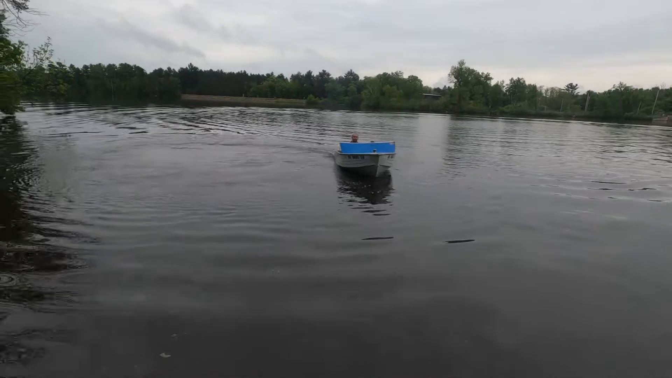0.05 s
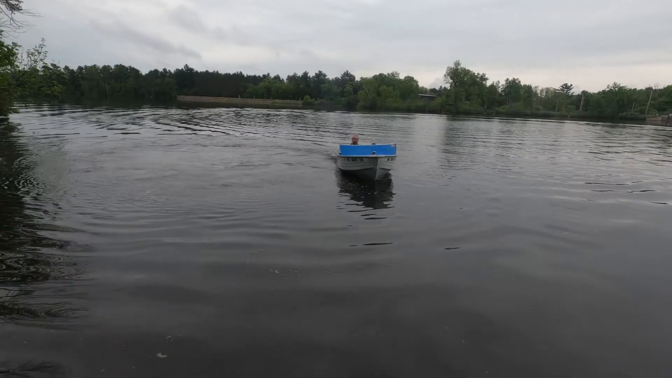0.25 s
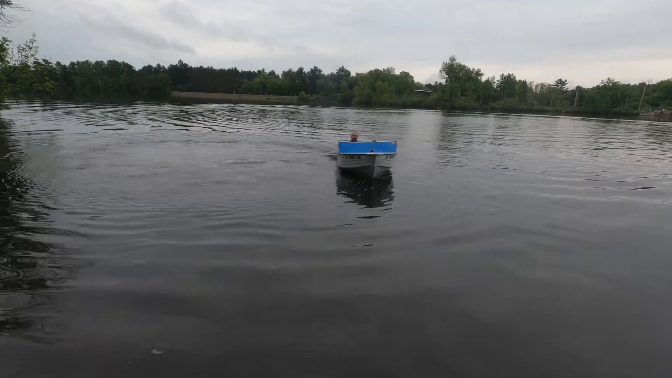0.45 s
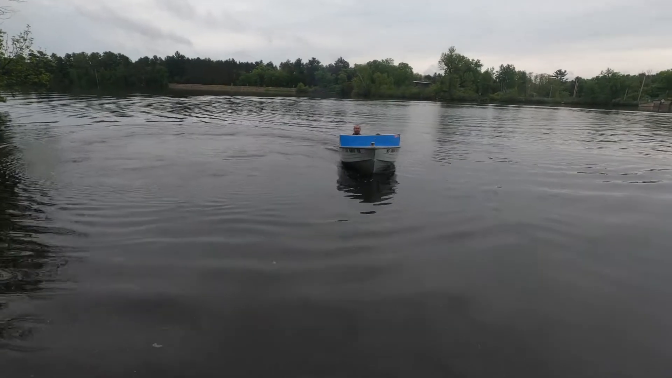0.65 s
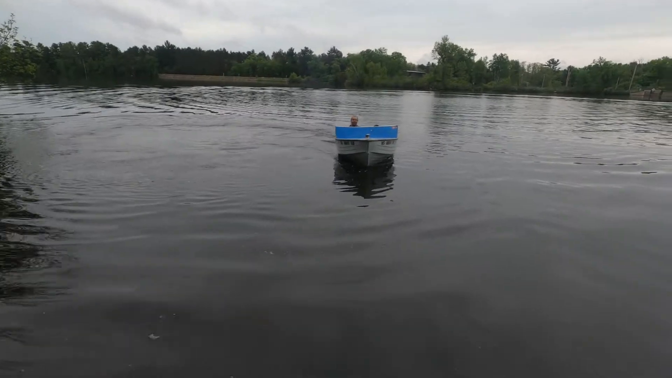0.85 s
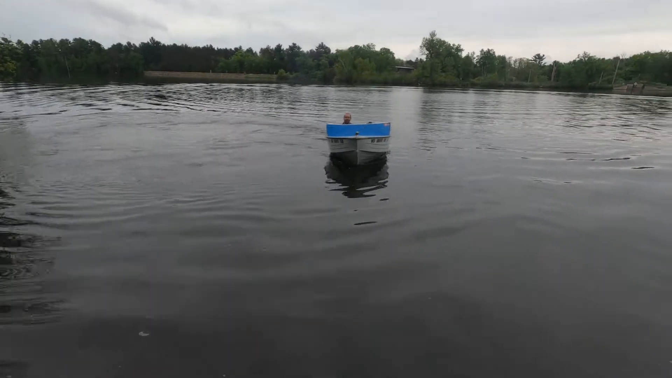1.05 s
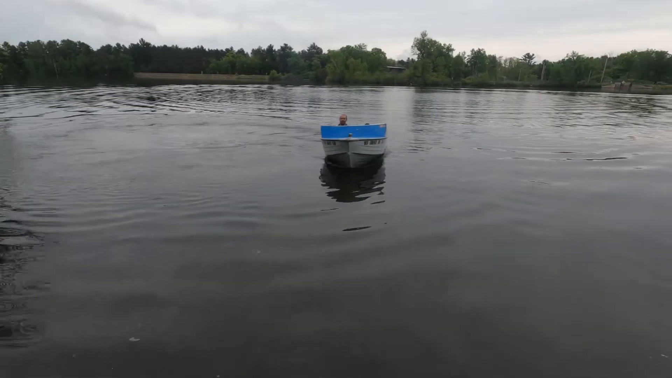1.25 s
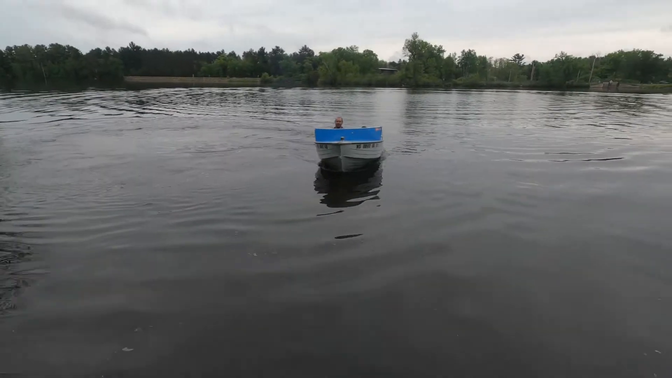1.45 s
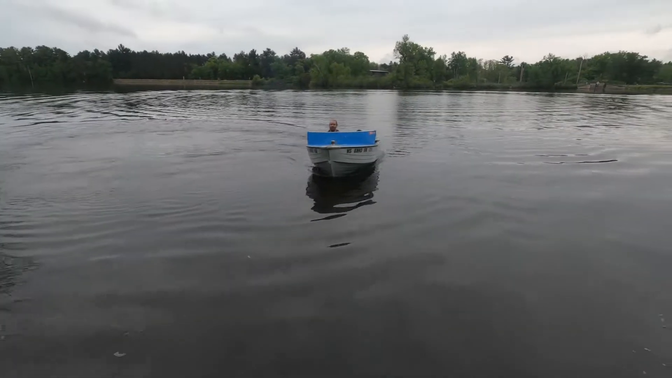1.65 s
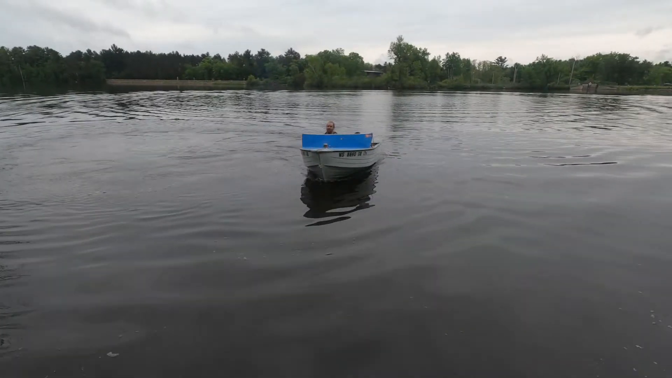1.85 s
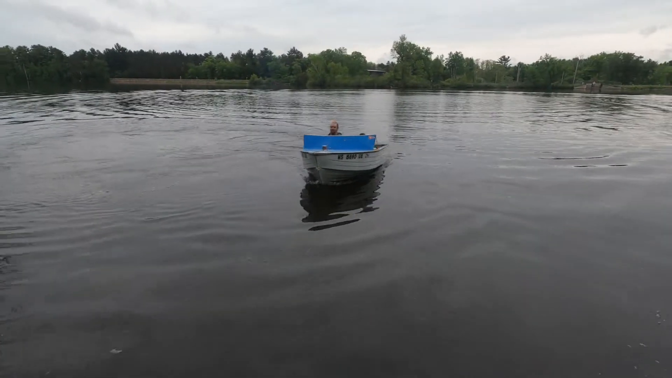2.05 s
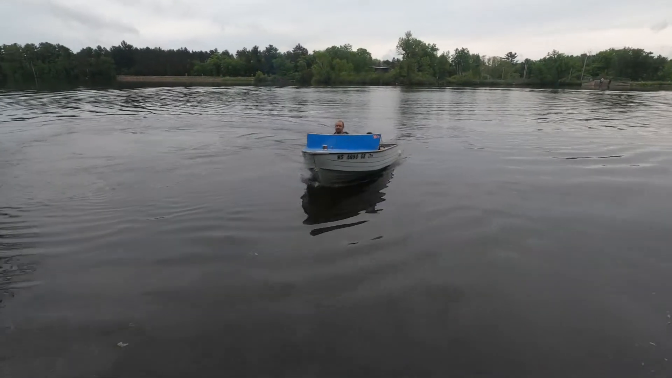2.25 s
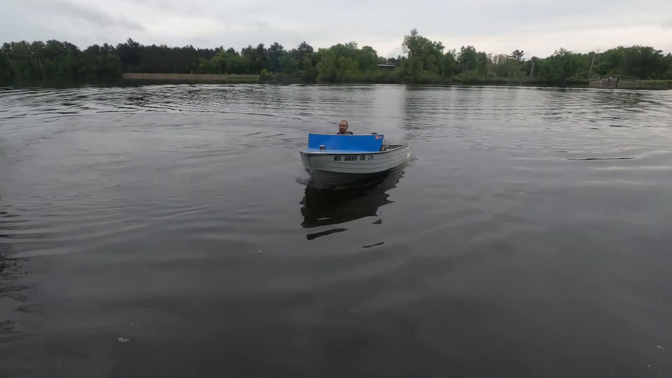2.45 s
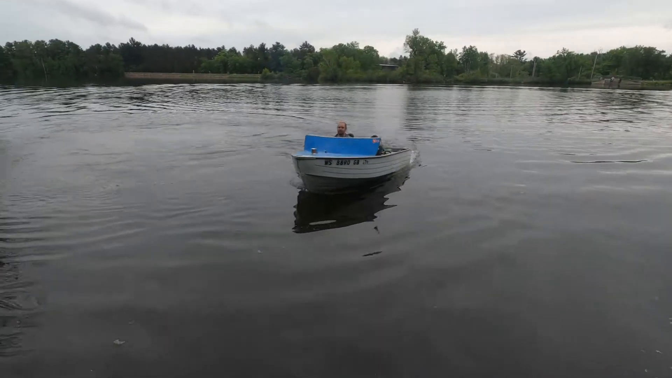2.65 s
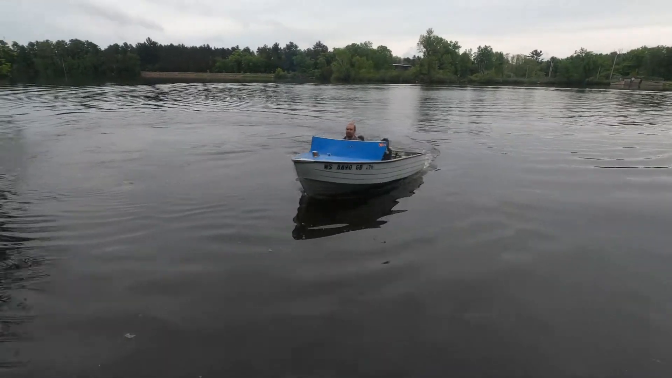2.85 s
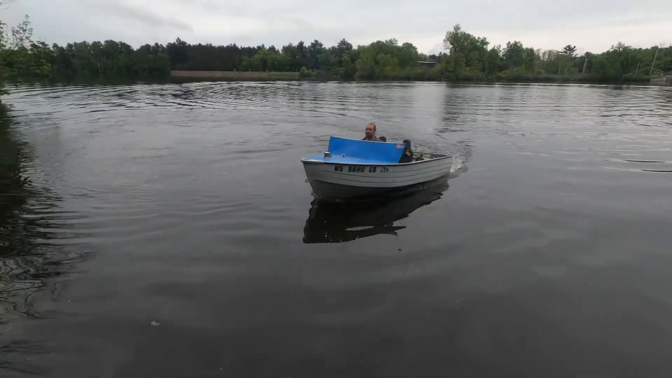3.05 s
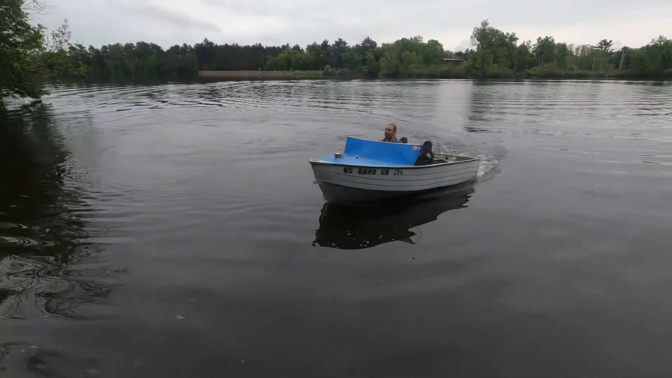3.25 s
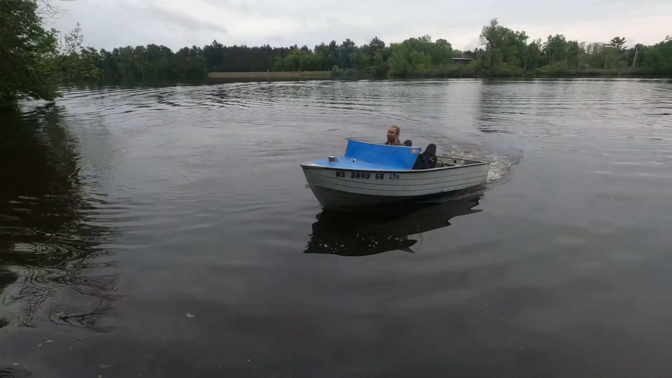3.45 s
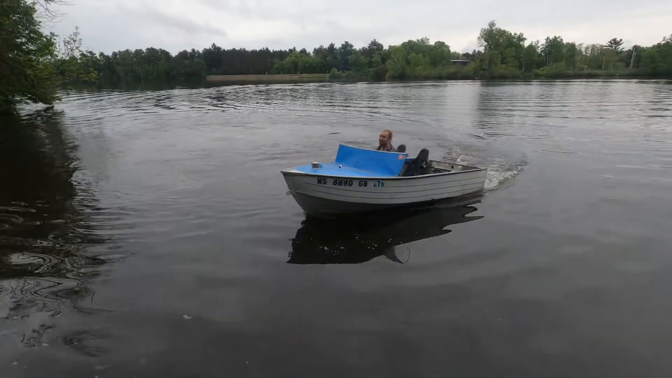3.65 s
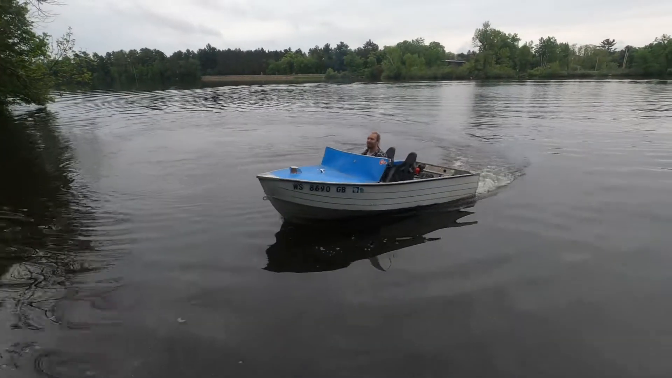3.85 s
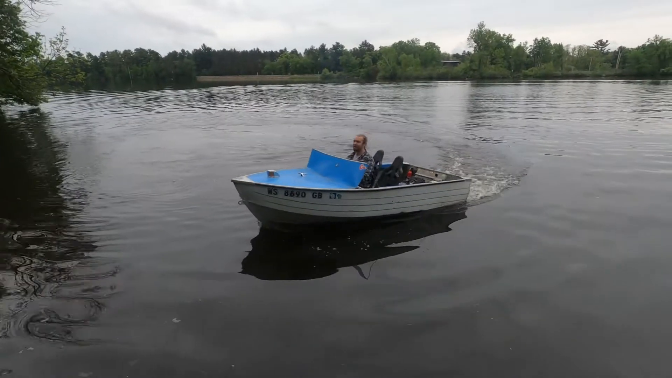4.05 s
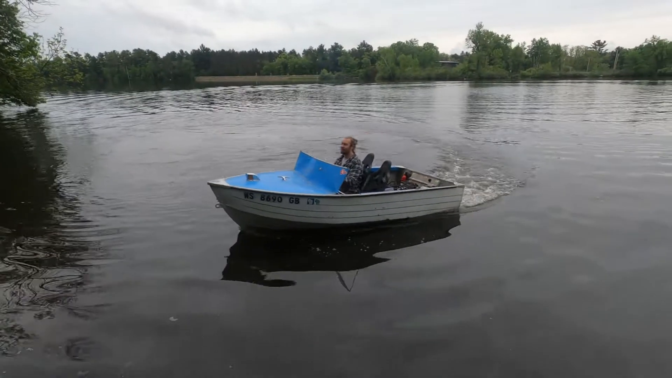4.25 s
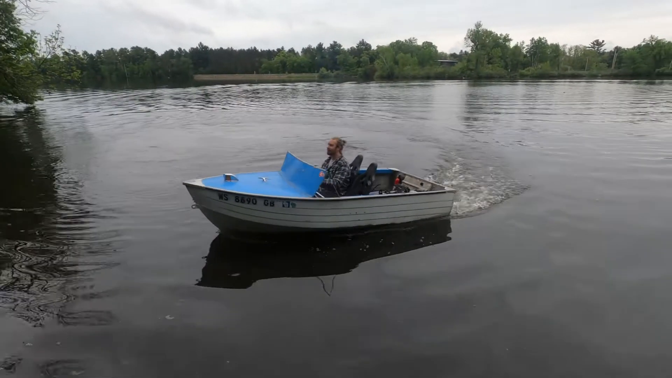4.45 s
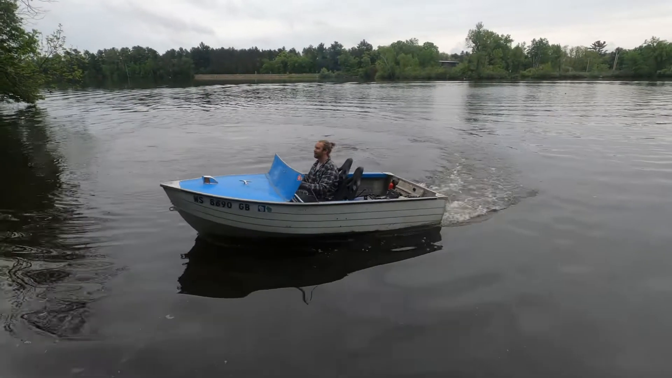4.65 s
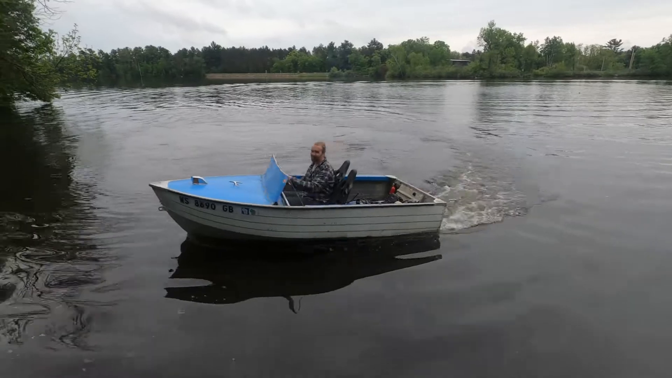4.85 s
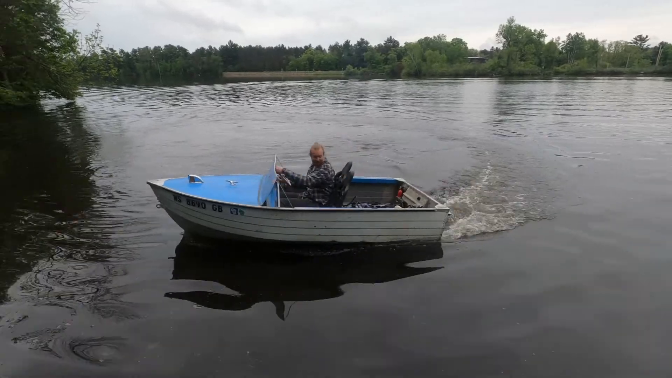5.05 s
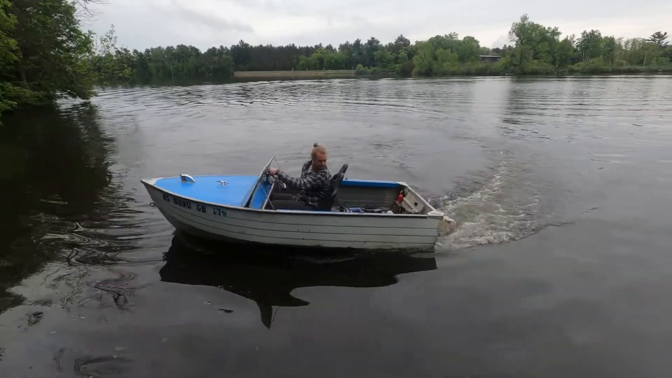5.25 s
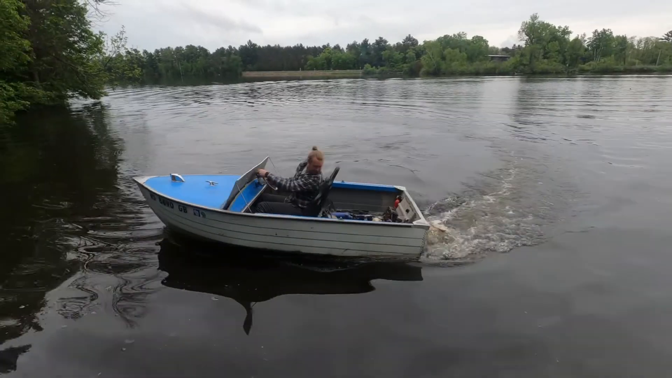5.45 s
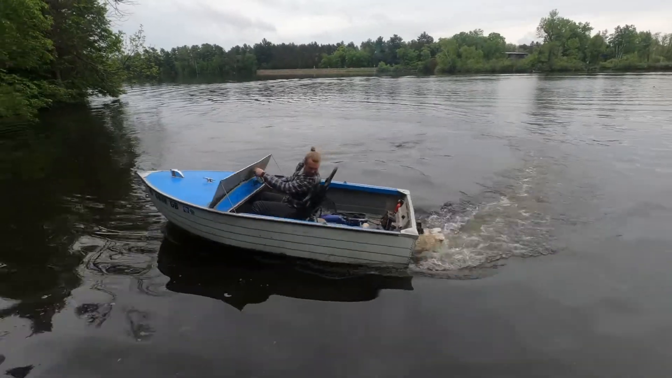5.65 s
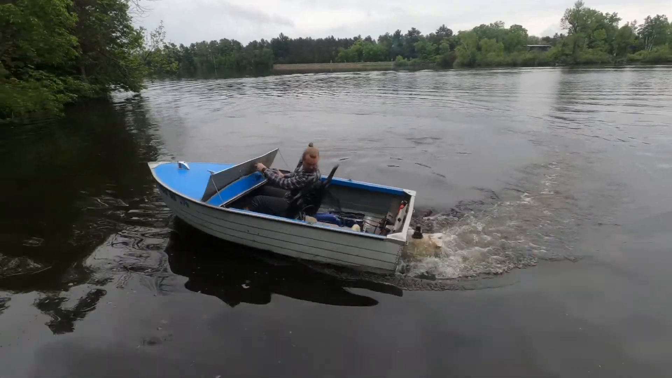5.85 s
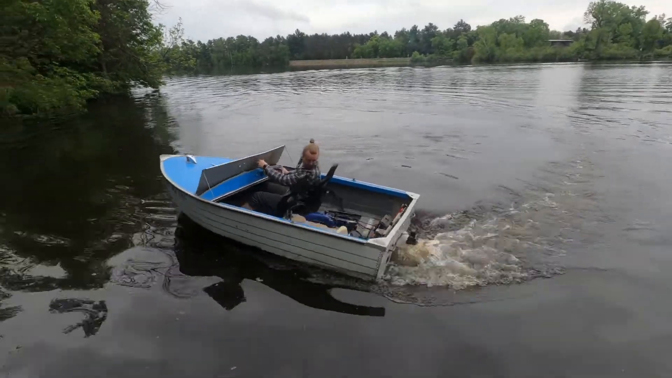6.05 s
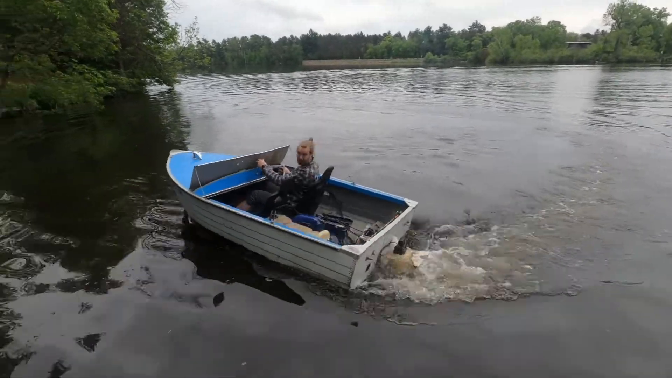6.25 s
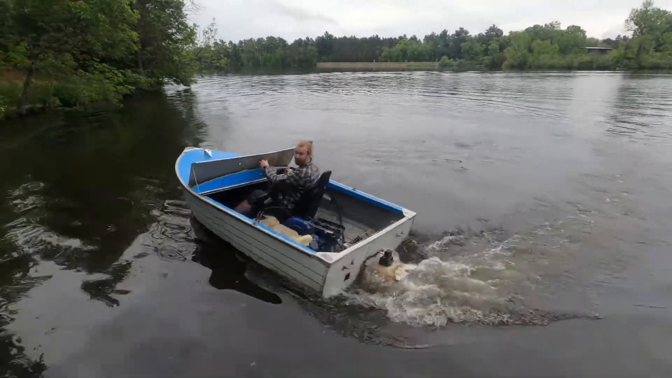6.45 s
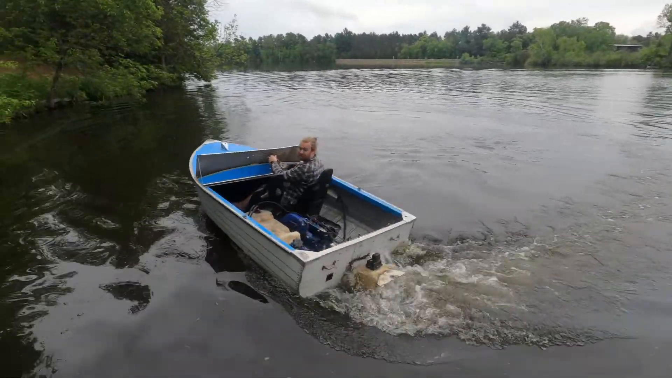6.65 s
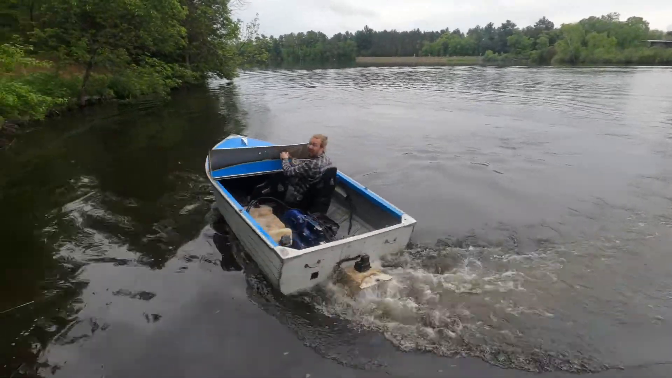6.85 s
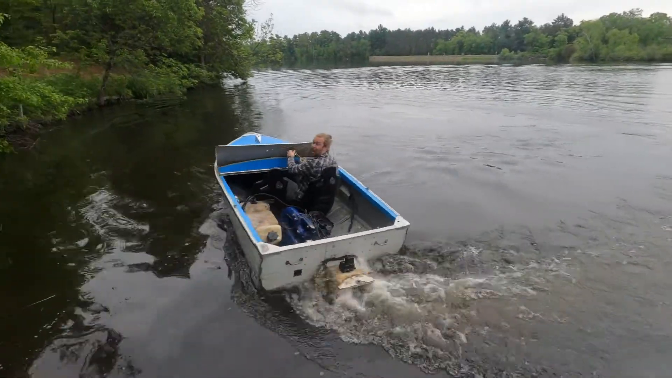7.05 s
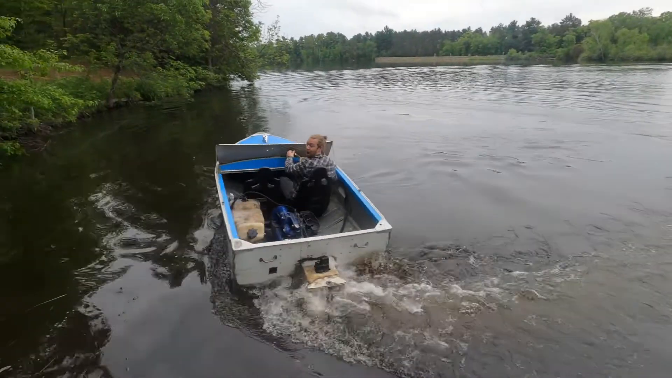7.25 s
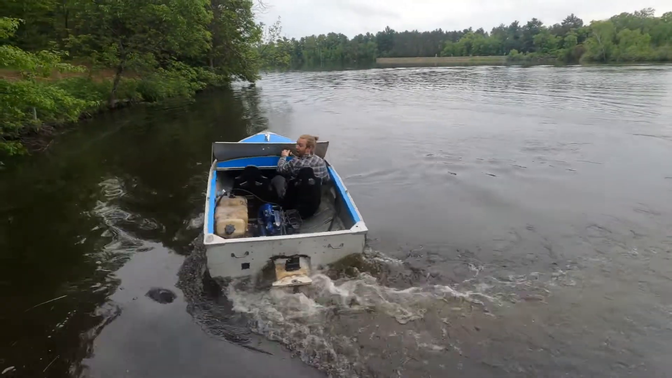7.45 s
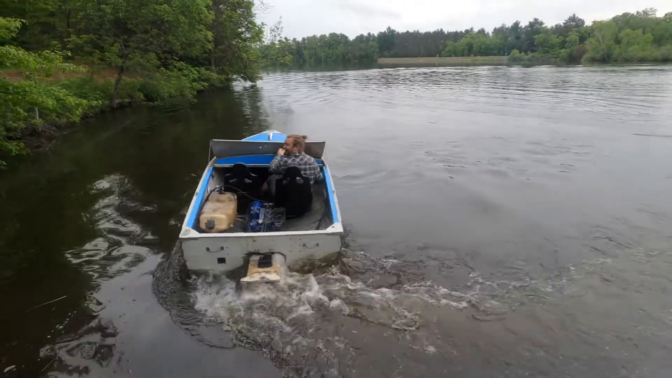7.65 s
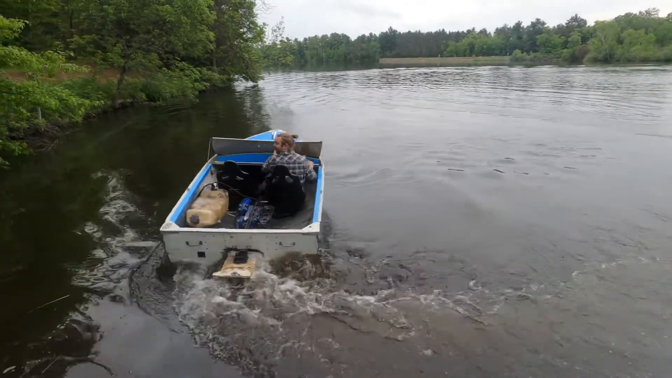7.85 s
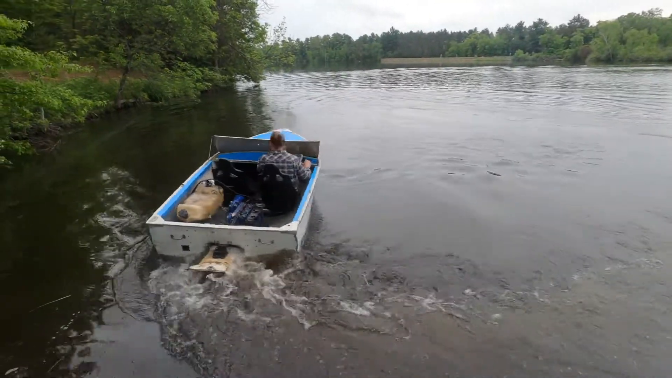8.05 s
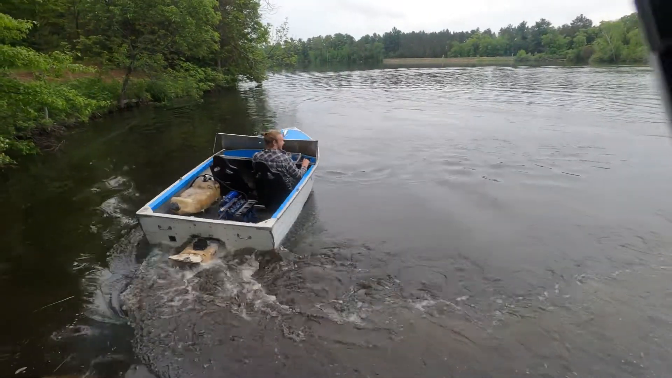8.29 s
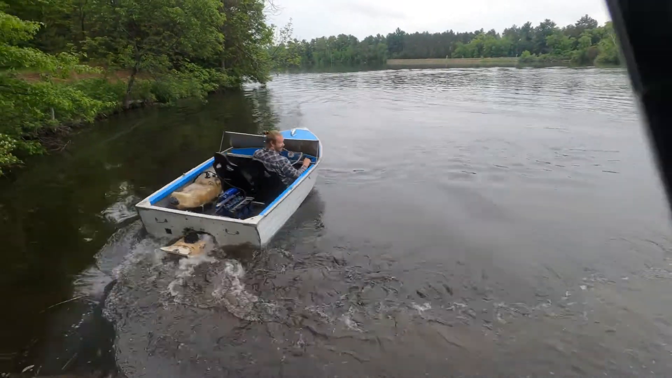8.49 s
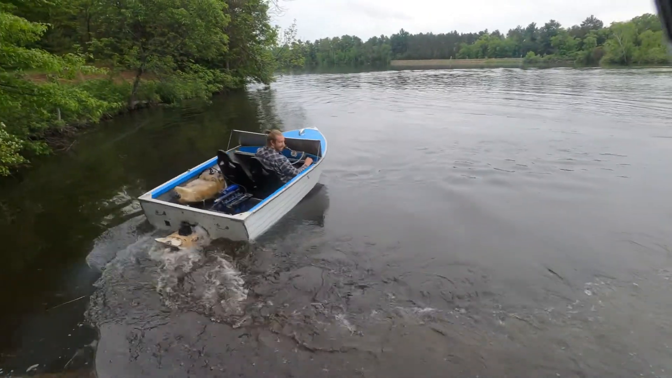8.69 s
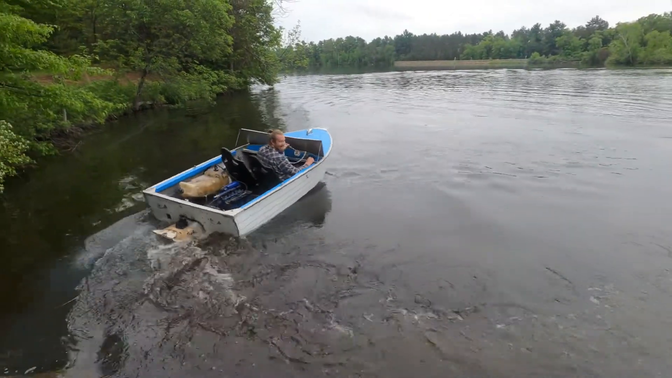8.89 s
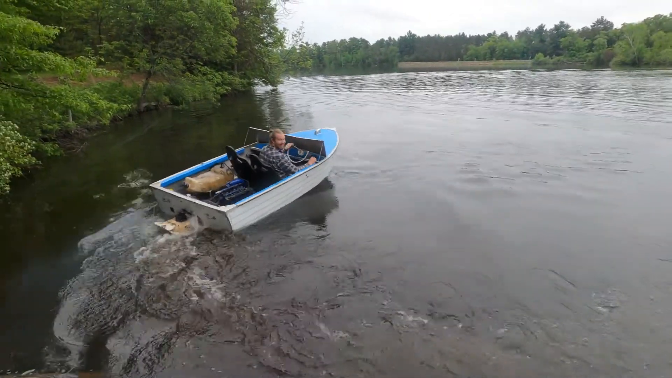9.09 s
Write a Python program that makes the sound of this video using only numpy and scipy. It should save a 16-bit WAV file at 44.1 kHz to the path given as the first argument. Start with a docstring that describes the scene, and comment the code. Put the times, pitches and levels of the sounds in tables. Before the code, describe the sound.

Over a deep rumble of wind on the microphone, a sputtering two-stroke boat engine approaches on open water. It stumbles at first and revs briefly twice, then settles into a steadier but still skipping rhythm. Up close, the exhaust barks, gurgles and spits loud bangs while churned water and fine spray swell behind it. The boat swings away with two more quick revs.

```python
"""A misfiring three-cylinder two-stroke drives a small jet boat that comes in on a lake and turns away.
Each firing rings the wet exhaust: it booms, honks, barks, cracks and gurgles, and the loudest ones bang.
Two cylinders skip turns, the third seldom catches, and the throttle blips four times.
Behind the engine, the jet's churned wake rushes louder as the stern swings round, over a deep
rumble of wind on the microphone. A fast compressor squeezes the peaks."""
import sys
import numpy as np
from scipy import signal
from scipy.fft import rfft, irfft, next_fast_len
from scipy.io import wavfile
from scipy.ndimage import uniform_filter1d, map_coordinates

SR = 44100
rng = np.random.default_rng(int(sys.argv[2]) if len(sys.argv) > 2 else 0)


def transcribe(u):
    """Save the signal u as a 16-bit wav file named by the first command-line argument.

    u: samples, shape (n,) or (channels, n), limited to [-1, 1]; the rate is SR.
    q: integer samples, one column per channel.
    """
    v = np.clip(np.atleast_2d(u).T, -1, 1)
    q = np.round(v * 32767).astype(np.int16)
    wavfile.write(sys.argv[1], SR, q)


N = 402191

# Engine texture: (time [s], roughness [0-1], pumping level [dB], first-cylinder miss level [dB])
TEXTURE = [(0, .22, -9, -15), (1.3, .25, -9, -15), (1.45, .18, -3, -15), (1.7, .22, -4, -15),
           (1.8, .3, -14, -15), (2.3, .3, -14, -15), (2.4, .1, -2, -15), (2.9, .12, -3, -15),
           (3, .2, -13, -15), (4.2, .13, -24, -15), (6.75, .09, -24, -13), (6.95, .04, -24, -5),
           (8.5, .03, -24, -6), (8.65, .04, -24, -15)]
def engine():
    """Blowdown pulses and the hot gas behind them ring the exhaust; higher resonances are noisier."""
    rough, pump_db, miss_db = curves(TEXTURE)
    when, fired = firings()
    first_missed = ~fired * [True, False, False]
    misses = amp(miss_db) * port_pulses(when, first_missed, rested_db=-4, weak_db=-58.5, scatter_db=1)
    pump = amp(pump_db) * port_pulses(when, fired, rested_db=0, weak_db=0, scatter_db=.5)
    blowdown = port_pulses(when, fired, rested_db=2.5, weak_db=-15, scatter_db=.8)
    # three attacks: a hard snap, a rounder push, a soft thump
    snap = .5 * pump + port_pulses(when, fired, rested_db=5, weak_db=-15, scatter_db=2)
    push = puff(pump + misses + blowdown, ms=.6)
    thump = puff(push, ms=.62)
    body = boom(thump, snap, rough)
    outlet = honk_and_bark(push, snap, 2 * rough) + crack_and_gurgle(snap, rough)
    return body + dulled(outlet, hz=5100) + spit(snap) + hull_drone(thump)


# Crank speed, with four throttle blips: (time [s], speed [turns/s])
CRANK_SPEED = [(0.0, 32.8), (0.3, 31.02), (1.2, 29.0), (1.34, 30.29), (1.42, 39.32), (1.56, 43.04),
               (1.66, 37.17), (1.85, 39.35), (2.05, 33.73), (2.3, 34.15), (2.42, 41.18), (2.66, 35.64),
               (2.92, 34.91), (3.0, 31.47), (3.3, 31.37), (3.9, 30.01), (4.3, 28.34), (5.1, 26.84),
               (5.3, 28.84), (6.5, 28.99), (7.1, 30.58), (8.0, 30.75), (8.36, 32.26), (8.46, 36.69),
               (8.62, 41.75), (8.8, 34.22), (9.0, 34.02), (9.12, 41.37)]
# Chance that a charge catches: (time [s], first cylinder [0-1], second [0-1], third [0-1])
FIRE_CHANCE = [(0, .8, .8, .5), (.1, .4, .25, .05), (1.3, .45, .3, .05), (1.5, .5, .6, .3),
               (1.7, .1, .2, .1), (2.3, .1, .3, .4), (2.36, .5, 1, .1), (3.2, .35, .75, .05),
               (4.2, .45, .4, 0), (4.3, .5, 1, 0), (9.12, .5, 1, 0)]
# The first cylinder's groove: (start [s], firing interval [turns, 0 = by chance])
FIRST_RHYTHM = [(2.356, 1), (2.613, 0), (4.369, 2), (4.548, 2), (4.801, 2), (4.948, 3), (5.059, 2),
                (5.692, 3), (5.796, 2), (6.142, 3), (6.246, 2), (6.453, 3), (6.556, 2), (6.829, 3),
                (6.927, 2), (7.125, 1), (7.712, 2), (8.134, 1), (8.647, 2), (8.723, 4), (8.837, 2),
                (9.013, 1)]
# The second cylinder, steady once under way, drops a beat: (time [s])
SECOND_STUMBLES = [4.923, 5.109, 5.6, 5.669, 6.805, 7.593, 7.886, 8.706]
# Clear firings after a lull in the uneven idle: (time [s])
IDLE_ACCENTS = [.192, .257, .443, .481, .548, .702, .789, 1.088, 1.609, 1.801, 1.859, 1.899, 1.969, 2.012,
                2.049, 2.294, 2.339, 2.675, 2.933, 2.988, 3.212, 3.269, 3.368, 3.432, 3.586, 3.725, 3.887,
                3.958, 4.128, 4.198, 4.316]
def firings():
    """A port opens every third of a turn: when each opens, and which cylinder fires on which turn."""
    crank = np.cumsum(curves(CRANK_SPEED)[0]) / SR
    crank -= crank[round(.0123 * SR)]  # the first port opening
    turns = int(crank[-1]) + 1
    when = np.interp(np.arange(3 * turns) / 3, crank, np.arange(N) / SR, right=N / SR)
    times, *cylinders = np.transpose(FIRE_CHANCE)
    chance = np.transpose([np.interp(when[::3], times, c) for c in cylinders])
    fired = rng.random((turns, 3)) < chance
    nearest = lambda grid, at: np.abs(grid[:, None] - at).argmin(axis=0)
    starts = list(nearest(when[::3], [s for s, _ in FIRST_RHYTHM])) + [turns]
    for (_, every), first, end in zip(FIRST_RHYTHM, starts, starts[1:]):
        if every:
            fired[first:end, 0] = np.arange(end - first) % every == 0
    fired[nearest(when[1::3], SECOND_STUMBLES), 1] = False
    fired, accents = fired.ravel(), nearest(when, IDLE_ACCENTS)
    for back in (1, 2, 3):  # a turn's lull sets up each accent
        fired[accents - back] = False
    fired[accents] = True
    return when, fired.reshape(turns, 3)


# Cylinder balance, first to third: (level [dB])
CYLINDER_BALANCE = [-1.5, 0, -4]
def port_pulses(when, strong, rested_db, weak_db, scatter_db):
    """One impulse per port opening, strong or weak, slightly loose in level and timing."""
    rested = ~np.roll(strong, 1, axis=0)  # for firings, a skipped turn leaves a fuller charge
    scatter, jitter = rng.standard_normal((strong.size, 2)).T
    db = np.where(strong, rested_db * rested, weak_db) + CYLINDER_BALANCE
    at = np.round((when + 50e-6 * jitter) * SR).astype(int).clip(0, N)
    return np.bincount(at, amp(db.ravel() + scatter_db * scatter), N + 1)[:N]


def gas(snap, ms, steady):
    """Turbulent hot gas: a noise burst on each pulse over a steady hiss."""
    return (flow(snap, ms) + steady) * rng.standard_normal(N)


def pipe_voice(drive, snap, modes, noise_share):
    """Exhaust resonances rung by clean pulses and roughened by the gas."""
    return blend(ringing(drive, modes), ringing(gas(snap, ms=3.9, steady=1), modes), noise_share)


# The exhaust's low body, its upper ring and the silencer: (pitch [Hz], width [Hz], level [dB])
BOOM_MODES = [(141.4, 13.7, -8), (202.4, 10, 5)]
UPPER_MODES = [(240.7, 68, 0)]
SILENCER_MODES = [(239.7, 131, 0.006)]
def boom(thump, snap, rough):
    """The silencer chamber fills first, so each boom swells over two cycles."""
    low = amp(reach("boom")) * pipe_voice(thump, snap, BOOM_MODES, rough)
    upper = amp(reach("upper")) * pipe_voice(thump, snap, UPPER_MODES, rough)
    return ringing(low - upper, SILENCER_MODES)


# The exhaust's midrange resonances: (pitch [Hz], width [Hz], level [dB])
HONK_MODES = [(396.4, 18, 0.69), (477.3, 7.2, 3)]
LOW_BARK_MODES = [(669, 48, 1), (759, 55, 1.5), (1069, 65, -9), (1453, 104, -9)]
HIGH_BARK_MODES = [(900, 67, 14.5), (1007, 84, -3.5)]
def honk_and_bark(push, snap, rough):
    """Rounded pulses ring a hollow honk in the pipe; hard ones ring a throaty bark."""
    honk = amp(reach("honk")) * pipe_voice(push, snap, HONK_MODES, rough)
    low = amp(reach("low")) * pipe_voice(snap, snap, LOW_BARK_MODES, rough)
    high = amp(reach("high")) * pipe_voice(snap, snap, HIGH_BARK_MODES, rough)
    return honk + low + high


# The outlet's bright resonances: (pitch [Hz], width [Hz], level [dB])
CRACK_MODES = [(1440, 76, 6), (1720, 280, 5), (2470, 1100, -1), (3450, 1230, -2)]
# How hard the engine works: (time [s], effort [0-1])
ENGINE_EFFORT = [(0, 0.63), (.1, 0.08), (1.25, 0), (1.45, 0.78), (1.65, 1), (1.78, 0.44), (2.28, 0.3),
                 (2.4, 0.85), (2.56, 0.86), (2.8, 0.36), (3.2, 0.12), (8.0, 0), (8.3, 0.33), (8.55, 0.7),
                 (8.8, 0.24), (8.97, 0.54), (9.12, 0.95)]
def crack_and_gurgle(snap, rough):
    """Gas bursts from the wet outlet; effort sharpens the crack and lifts it over the bubbles."""
    effort = curves(ENGINE_EFFORT)[0]
    attack = ringing(gas(snap, ms=.8, steady=.02) + (.6 + 1.2 * effort) * unit(snap), CRACK_MODES)
    rasp = ringing(gas(snap, ms=3, steady=.2), CRACK_MODES)
    crack = blend(attack, rasp, noise_share=(.15 + 1.5 * rough) * (1 - .7 * effort))
    gurgle = even(bubbles(flow(snap, ms=3), count=3000, hz=2100, cycles=8, spread_db=2))
    return amp(reach("crack")) * (amp(-8.5) * crack + amp(-9 - 5.6 * effort) * gurgle)


def bubbles(density, count, hz, cycles, spread_db):
    """Bubbles ring as short rising notes, clustered where density is high."""
    place, rarity = rng.random((count, 2)).T[:, :, None]
    pitch = (hz * np.exp(.472 * rng.standard_normal((count, 1)))).clip(700, 8000)
    age = np.arange(500) / SR * pitch  # in cycles
    envelope = age * np.exp(-age * 4 / cycles)
    gain = amp(-spread_db * np.log(rarity + .00084))  # a few pop out loud
    notes = gain * envelope * np.sin(2 * np.pi * age * (1 + .0036 * age))
    at = np.searchsorted(np.cumsum(density), place * density.sum()) + np.arange(500)
    return np.bincount(at.ravel(), notes.ravel(), N + 501)[:N]


# The sizzle of fine spray: (frequency [Hz], spectral level [dB])
SPRAY_SPECTRUM = [(4000, -35.5), (7000, -7.5), (8500, -8), (10500, -11.5), (12500, -13), (14000, -16),
                  (15400, -51)]
def spit(snap):
    """Each exhaust pulse spits a burst of spray."""
    return amp(reach("spray") + 3) * flow(snap, ms=2.9) * coloured(SPRAY_SPECTRUM)


# The hull's bass resonance: (pitch [Hz], width [Hz], level [dB])
HULL_MODES = [(64.4, 15, 0)]
def hull_drone(thump):
    """The engine's pulses keep the hull droning."""
    return amp(reach("hull") - 2.5) * even(ringing(ringing(thump, HULL_MODES), HULL_MODES))


# The loudest exhaust hits: (time [s], level [dB])
BANG_HITS = [(1.44, -24), (1.6494, -19), (1.703, -15), (1.818, -17.5), (1.9674, -22), (2.0093, -16),
             (2.4838, -15), (2.5596, -18), (2.613, -15), (2.6693, -13.5), (2.997, -18), (3.229, -10.5),
             (3.5846, -9), (3.8866, -17), (4.1373, -12), (4.9606, -18), (5.6346, -10), (5.7053, -11),
             (5.8681, -20), (6.0741, -17), (6.142, -17), (6.3819, -15), (6.4535, -9), (6.558, -11.5),
             (6.626, -13), (6.6922, -10), (6.76, -8), (6.8269, -9), (7.4949, -17.5), (7.6246, -11),
             (7.7214, -11.5), (7.852, -12.5), (7.9102, -7), (7.9738, -10), (8.424, -8), (8.6482, -8),
             (8.6805, -5), (8.732, -14), (8.8376, -11.5), (8.8757, -17)]
def bangs():
    """A sharp crack with a splashy tail, as the outlet spits water."""
    times, db = np.transpose(BANG_HITS)
    hits = np.bincount(np.round(times * SR).astype(int), amp(db), N)[:N]
    envelope = puff(hits, ms=.62) + amp(-6) * puff(hits, ms=5.1)
    splash = unit(ringing(rng.standard_normal(N), CRACK_MODES[1:] + [(4500, 2350, -12)]))
    return dulled(envelope * splash, hz=9000)


# The rush of churned water: (frequency [Hz], spectral level [dB])
WAKE_SPECTRUM = [(250, -12), (600, 1), (1100, -0.5), (1500, -8), (2500, -12), (4200, -21.5), (5200, -26),
                 (8000, -34), (10000, -47), (14000, -93)]
def wake():
    """The jet churns up a patchy rush and fine spray that surge together."""
    bands = signal.stft(coloured(WAKE_SPECTRUM), nperseg=512)[2]
    patches = uniform_filter1d(rng.standard_normal(bands.shape), size=6, axis=0)  # across pitch
    patches = unit(uniform_filter1d(patches, size=8, axis=1))  # across time
    rush = unit(signal.istft(bands * amp(3.1 * patches), nperseg=512)[1][:N])
    surge = wobble(12)
    spray = amp(reach("spray") + 1 + .6 * surge) * coloured(SPRAY_SPECTRUM)
    return amp(reach("wake") + 17 + 1.33 * surge) * rush + spray


# The low bed of wind rumble: (frequency [Hz], spectral level [dB])
RUMBLE_SPECTRUM = [(15, -37.5), (28, 18.5), (40, 19.5), (52, -6), (100, 20), (140, 24), (200, -65)]
def low_rumble():
    """A deep, gently swelling rumble of wind on the microphone and the hull."""
    return amp(reach("rumble") + .5 + .56 * wobble(2)) * coloured(RUMBLE_SPECTRUM)


# The boat closes in and swings round: (time [s], heading [deg, 0 bow on, 180 stern on], distance [m])
BOAT_PATH = [(0, 0, 22), (2, 10, 17), (3.5, 45, 13), (5.3, 90, 9), (6.3, 125, 8), (7.5, 180, 8),
             (8.3, 200, 9), (9.12, 235, 11)]
# The angles at which the mix is set: (heading [deg])
HEADINGS = [0, 5, 10, 45, 90, 125, 155, 180, 200, 235]
# Each layer's fader: (gain at full effort [dB], level at 10 m for each heading [dB])
LAYER_MIX = {"boom": (-3.5, [-3, -9, -12.5, -8.5, -13, -12.5, -11, -12, -10.5, -14]),
             "upper": (9.9, [-24.5, -27.5, -18, -17.5, -19.5, -17.5, -17.5, -18, -16.5, -19]),
             "honk": (-5.5, [-31.5, -26, -26, -34.5, -31.5, -25.5, -20.5, -19, -22.5, -21.5]),
             "low": (6.4, [-29, -27, -25.5, -25, -30, -37.5, -29, -25, -24.5, -32]),
             "high": (4, [-41.5, -39, -44, -30, -26, -26, -30.5, -32.5, -28.5, -30]),
             "crack": (11.1, [-39, -38.5, -33, -32, -30, -26, -25, -26.5, -26, -27]),
             "wake": (4, [-50, -51.5, -49.5, -49.5, -47.5, -45.5, -45.5, -46.5, -44, -47]),
             "spray": (2.7, [-64, -65, -62, -61.5, -56.5, -52.5, -50.5, -54.5, -53, -57]),
             "hull": (.1, [-21.5, -23.5, -21.5, -28, -35, -36, -32, -35, -31, -50.5]),
             "rumble": (2.1, [-26.5, -25.5, -22.5, -32.5, -33, -37, -35, -32, -35.5, -36])}
def reach(layer):
    """A layer's fader ride in dB, from the boat's heading, its distance and the engine's effort."""
    effort_db, heading_db = LAYER_MIX[layer]
    heading, metres = curves(BOAT_PATH)
    heard_db = np.interp(heading, HEADINGS, heading_db) - 20 * np.log10(metres / 10)
    return heard_db + effort_db * curves(ENGINE_EFFORT)[0]


def amp(db):
    """dB to gain."""
    return 10 ** (np.asarray(db) / 20)


def unit(x):
    """Scaled to rms 1."""
    return x / np.sqrt(np.mean(x ** 2) + 1e-20)


def running_rms(x, samples):
    """A smooth level follower."""
    return np.sqrt(np.abs(uniform_filter1d(uniform_filter1d(x * x, samples), samples)) + 1e-20)


def even(x):
    """Levelled to rms 1 over about a third of a second."""
    return x / running_rms(x, 9000)


def blend(clean, noisy, noise_share):
    """An equal-power crossfade, held at an even level."""
    return even(np.sqrt(1 - noise_share) * even(clean) + np.sqrt(noise_share) * even(noisy))


def curves(rows):
    """One value per sample for each column after the time."""
    times, *columns = np.transpose(rows)
    return [np.interp(np.arange(N) / SR, times, c) for c in columns]


def wobble(rate):
    """A smooth random curve, rate knots a second."""
    return map_coordinates(rng.standard_normal(int(N * rate / SR) + 4), [np.arange(N) * rate / SR])


def puff(x, ms):
    """Every impulse becomes a push that peaks after ms and dies away."""
    age = np.arange(SR // 10) / (SR * ms / 1000)
    return signal.fftconvolve(x, age * np.exp(-age))[:N]


def flow(pulses, ms):
    """The envelope of gas flow after each pulse, at rms 1."""
    return unit(np.abs(puff(pulses, ms)))


def filtered(x, response):
    """x times a complex response of frequency."""
    size = next_fast_len(N + SR // 2)
    return irfft(rfft(x, size) * response(np.fft.rfftfreq(size, 1 / SR)), size)[:N]


def ringing(x, modes):
    """x through resonances side by side, alternating in polarity."""
    return filtered(x, lambda f: sum(
        (-1) ** k * amp(db) * 1j * f * width / (hz * hz - f * f + 1j * f * width)
        for k, (hz, width, db) in enumerate(modes)))


def coloured(spectrum):
    """Noise of rms 1 with this spectrum."""
    hz, db = np.transpose(spectrum)
    response = lambda f: amp(np.interp(np.log(f + 1), np.log(hz), db))
    return unit(filtered(rng.standard_normal(N), response))


def dulled(x, hz):
    """Steep low-pass: the far, shaded outlet loses its top."""
    return signal.sosfilt(signal.butter(4, hz, fs=SR, output="sos"), x)


def scene():
    """Engine and bangs up front, wake and wind behind, in mono."""
    return (engine() + bangs() + wake() + low_rumble())[None]


def record(dry):
    """A fast compressor evens out the booms, peaks are rounded off, the top fades above 11 kHz."""
    knee, ceiling, top_hz = .21, .85, 15400
    level = running_rms(dry[0], 500)
    squeezed = amp(2) * dry[0] / (1 + (level / knee) ** 2) ** .29
    rounded = squeezed / (1 + (squeezed / ceiling) ** 4) ** .25
    return filtered(rounded, lambda hz: (hz < top_hz) / (1 + (hz / 12500) ** 9))[None]


dry = scene()
out = record(dry)
transcribe(out)
```